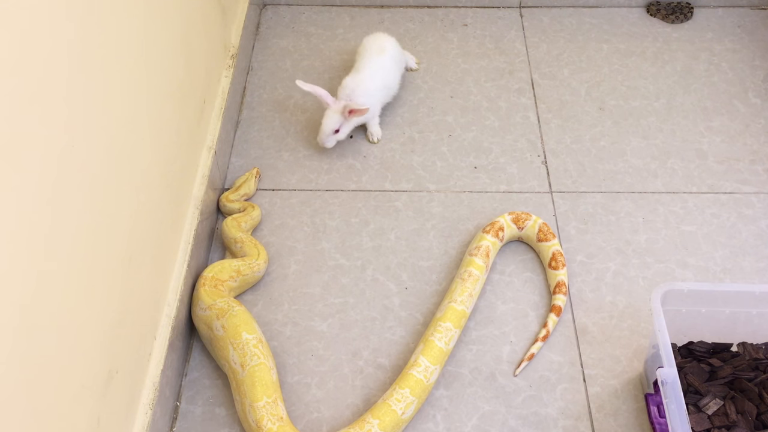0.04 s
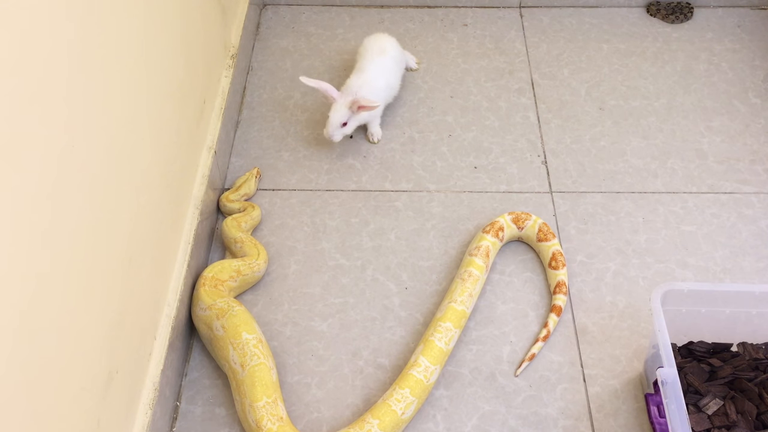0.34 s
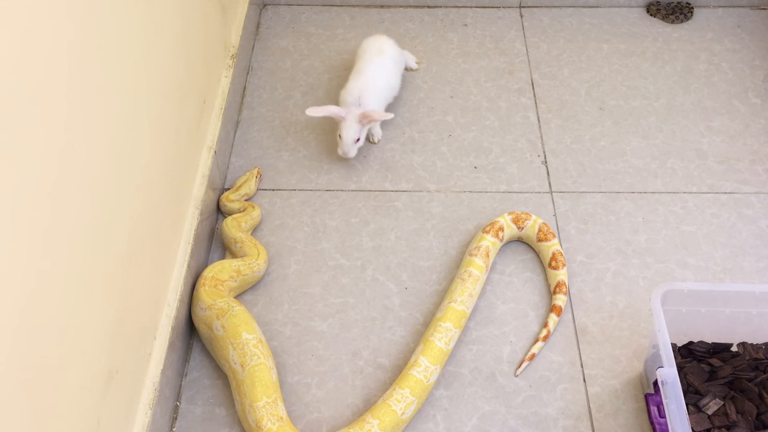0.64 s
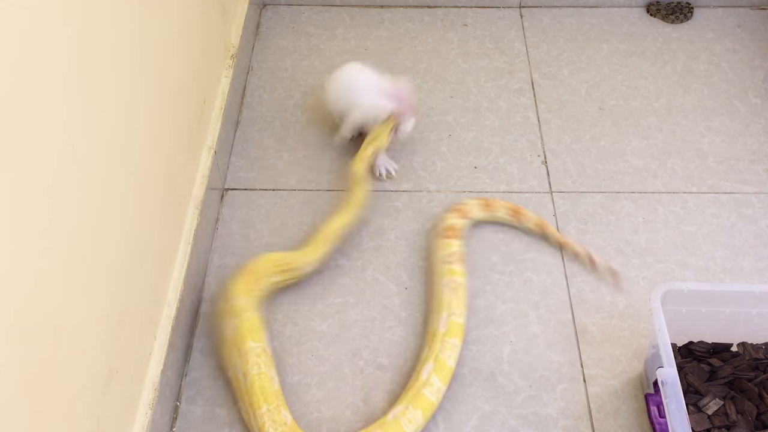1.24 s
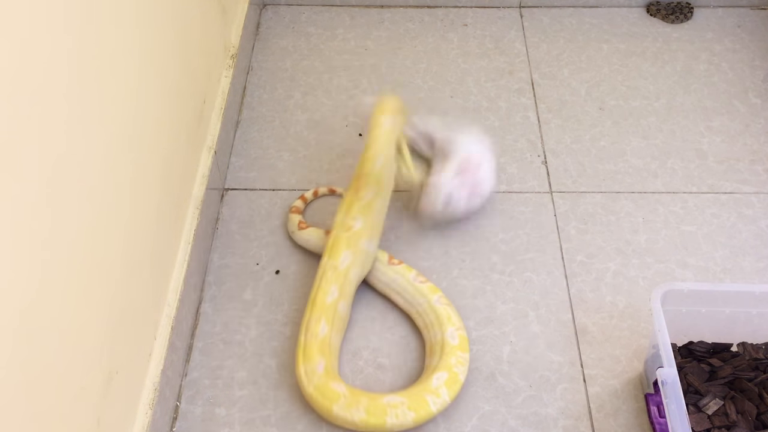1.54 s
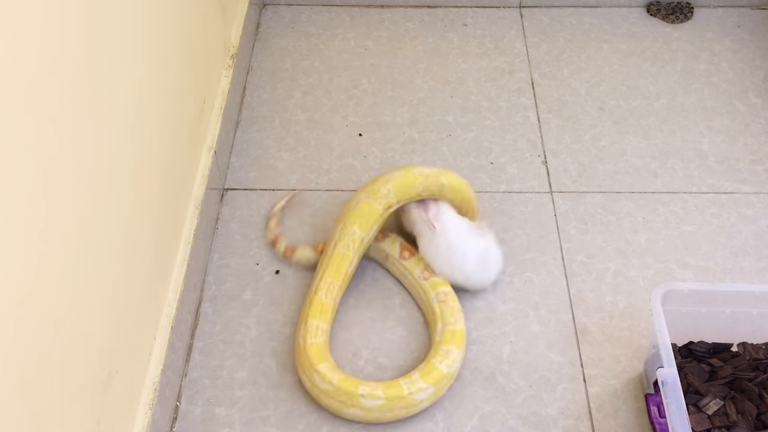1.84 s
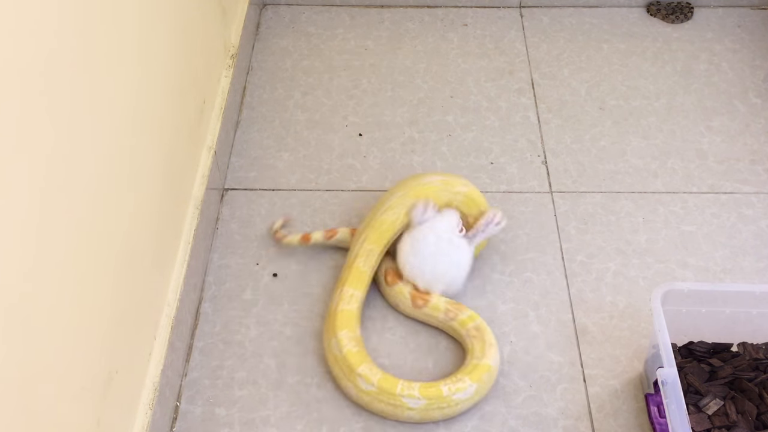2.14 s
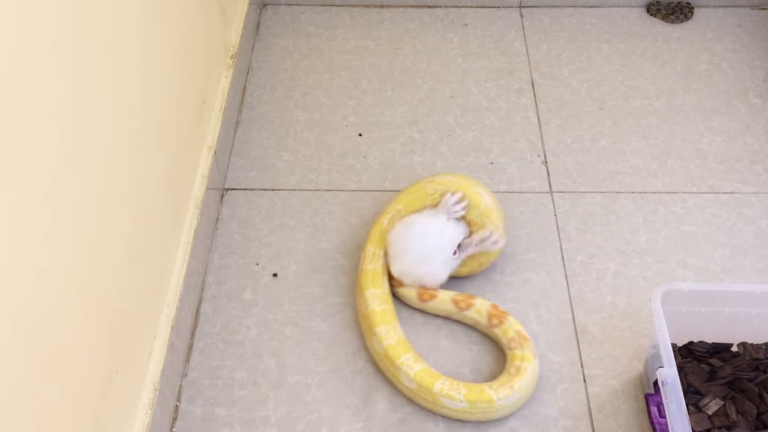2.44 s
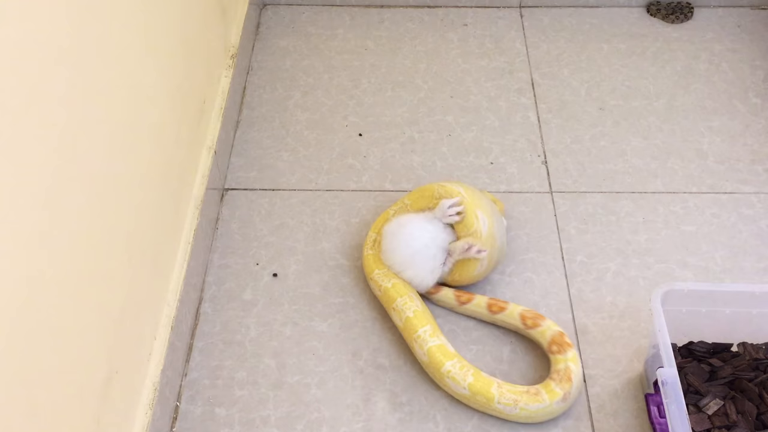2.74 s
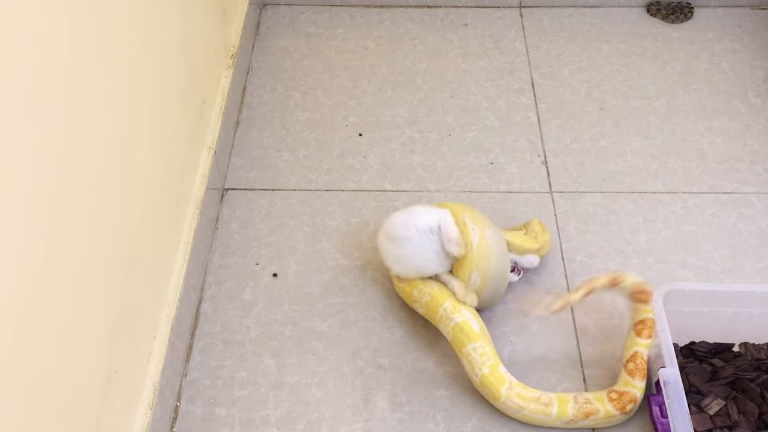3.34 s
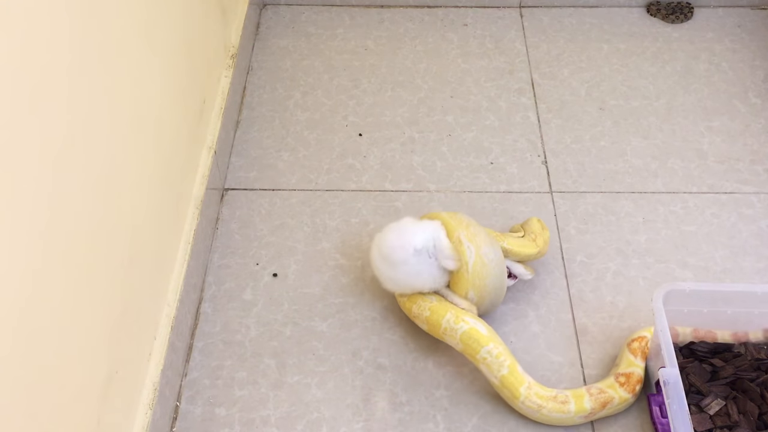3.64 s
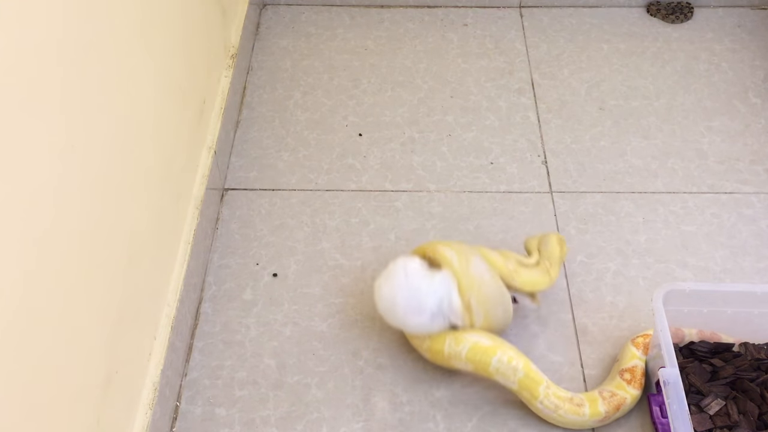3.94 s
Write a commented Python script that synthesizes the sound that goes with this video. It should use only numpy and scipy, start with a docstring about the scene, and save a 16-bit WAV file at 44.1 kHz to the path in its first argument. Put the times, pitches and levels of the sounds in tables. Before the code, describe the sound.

A rabbit's loud, high-pitched squeal turns to a hoarse scream in an echoing room.

```python
"""A python seizes a rabbit in a bare, reverberant tiled room, over a low ventilation hum.
First come a faint squeak and the friction noise of a scuffle on the tiles. The rabbit's vocal folds
then sound a rising yelp and a long squeal, harmonics shaped by the resonances of the throat; the squeal
jumps in pitch and tears into a rasp. Last, the folds vibrate chaotically in a hoarse, pitchless
scream that fades."""
import sys
import numpy as np
from scipy import signal
from scipy.fft import rfft, irfft
from scipy.io import wavfile

SR = 44100
rng = np.random.default_rng(int(sys.argv[2]) if len(sys.argv) > 2 else 0)


def put_to_file(sound):
    """Save the sound as 16-bit audio at rate SR, in the file named by the first command-line argument."""
    columns = np.atleast_2d(sound).T  # one column per channel
    safe = np.clip(columns, -1, 1)
    whole_steps = np.round(safe * 32767)
    wavfile.write(sys.argv[1], SR, whole_steps.astype(np.int16))


N = 176400
T = np.arange(N) / SR

# Spectrum of the moving air. Each row: frequency in Hz, relative level in dB.
AIR_SPECTRUM = [(20, -62), (32, -56), (40, -16), (49, -3.5), (64, -7), (80, -0.5), (98, -9), (125, -3),
                (160, -4.5), (200, -11.5), (310, -16), (420, -21.5), (550, -19), (680, -16), (820, -23.5),
                (1210, -23.5), (2020, -27), (3000, -36), (3930, -46), (6000, -56), (15000, -67)]
# Ventilation tones. Each row: frequency in Hz, level in dB.
HUM_TONES = [(64.6, -48), (118.8, -50.5), (231.5, -60), (549, -66), (646, -71)]
# Reverberation time. Each row: frequency in Hz, seconds to decay by 60 dB.
ROOM_T60 = [(500, 1.6), (2500, 1.59), (5000, 1.3), (9000, 1.22), (15000, 0.74)]
# Floor and wall reflections. Each row: delay in seconds, level in dB relative to the direct sound.
REFLECTIONS = [(.0019, -21), (.0046, -5.5)]
# Bands of the squeak. Each row: centre in Hz, level in dB.
SQUEAK_BANDS = [(4140, -72), (5520, -70), (7170, -71), (8720, -71), (10400, -83), (12850, -83),
                (14250, -88)]
# Scuffs and bumps. Each row: start, attack and decay in seconds, level in dB, centre and width in Hz.
SCUFFS = [(1.19, .035, 0.067, -59.5, 11700, 16200), (1.245, 0.026, 0.016, -47, 1200, 2480),
          (1.336, 0.021, 0.0074, -51, 3650, 1100), (1.28, 0.083, 0.11, -57, 9900, 16000),
          (1.608, 0.0023, 0.015, -42, 800, 1080), (1.63, 0.062, 0.039, -44.5, 230, 300),
          (1.65, 0.044, 0.026, -44, 856, 1000), (3.599, 0.11, 0.89, -49, 1326, 1320),
          (3.62, 0.031, .3, -58, 657, 250)]
# Throat response for the tone, the rasp and the scream. Each row: frequency in Hz, relative gain in dB.
TONE_SPECTRUM = [(1200, -24), (1800, -4.5), (2300, -8.5), (2950, -3), (3800, 8), (4750, 3), (5900, 0),
                 (7200, -8.5), (9300, -7), (10500, -20.5), (12000, -13), (15500, -22)]
RASP_SPECTRUM = [(1000, -51), (1800, -29), (2400, -4.5), (3000, -8.5), (3450, 8.5), (4100, -0.5), (5300, 3),
                 (6500, -8.5), (8000, -15), (9600, -7), (12000, -22), (15500, -26)]
SCREAM_SPECTRUM = [(600, -21.5), (1500, -23.5), (2000, -2), (2800, 2), (5200, -3), (6200, -8), (8400, -14),
                   (10000, -14), (12200, -22), (15500, -30)]
# The yelp. Each row: time in seconds, pitch in Hz, level in dB, roughness from 0 to 1.
YELP_CONTOUR = [(1.708, 1290, -54, 0.67), (1.724, 1610, -36, 0.47), (1.746, 1784, -33, 0.18),
                (1.76, 2177, -25, 0.27), (1.772, 2410, -23.5, 0.06), (1.79, 2515, -24, 0),
                (1.803, 2254, -33, .1), (1.808, 2400, -73, .3)]
# Fundamental of the squeal. Each row: time in seconds, pitch in Hz.
SQUEAL_PITCH = [(1.86, 2430), (1.95, 2655), (2.0, 2676), (2.03, 2883), (2.112, 2992), (2.114, 2580),
                (2.13, 2342), (2.156, 2340), (2.158, 2933), (2.176, 2926), (2.178, 2327), (2.29, 2223),
                (2.312, 2344), (2.34, 2304), (2.395, 2361), (2.45, 2334), (2.514, 2371), (2.515, 2702),
                (2.6, 2834), (2.66, 2906), (2.745, 3173), (2.77, 2650), (2.83, 2874), (2.88, 3011),
                (2.94, 2674), (2.99, 2633), (3.03, 2418), (3.06, 2574), (3.09, 2413), (3.11, 1972),
                (3.22, 1827)]
# Vocal effort. Each row: time in seconds, level in dB, spectral tilt in dB per octave.
SQUEAL_EFFORT = [(1.86, -40.5, -32), (1.96, -35.5, -17), (2.08, -34.5, -7), (2.135, -36.5, -4.5),
                 (2.19, -44.5, -11.5), (2.25, -30, -8.5), (2.4, -27, -5), (2.5, -23, -1), (2.53, -32, -1),
                 (2.64, -29.5, 0.5), (2.74, -24.5, 1.5), (2.83, -21, -5.5), (2.9, -23.5, -3.5),
                 (2.98, -21.5, 4.5), (3.07, -22, -5.5), (3.125, -24.5, 4.5), (3.2, -31.5, -7.5)]
# Irregularity of the folds. Each row: time in seconds, roughness and rasp share from 0 to 1.
SQUEAL_ROUGHNESS = [(1.86, .22, .25), (2.0, .25, .14), (2.12, .33, .2), (2.22, .08, .04), (2.28, .04, .01),
                    (2.51, .04, .01), (2.53, .24, .03), (2.72, .27, .07), (2.78, .38, .2), (2.9, .36, .33),
                    (2.95, .36, .8), (3.02, .24, .76), (3.08, .18, .55), (3.13, .22, .52), (3.2, .4, .85)]
# Period doubling. Each row: time in seconds, gain of the half-order harmonics in dB.
SQUEAL_DOUBLING = [(2.41, -52), (2.43, -24.5), (2.51, -20.5), (2.53, -42)]
# Surges as the squeal catches. Each row: time and Gaussian width in seconds, boost in dB.
SQUEAL_SURGES = [(2.012, .004, 8), (2.04, .005, 4), (2.079, .006, 8), (2.111, .005, 7), (2.167, .006, 14)]
# The scream. Each row: time in seconds, level in dB, main resonance in Hz, treble gain in dB.
SCREAM_CONTOUR = [(3.445, -39, 3002, 2.5), (3.46, -27.5, 3200, 6), (3.49, -21, 3900, 7),
                  (3.525, -25.5, 4086, 7), (3.565, -28.5, 3950, 5), (3.6, -25, 3900, 5),
                  (3.66, -29.5, 3236, 5), (3.8, -36.5, 3224, 5), (3.9, -31.5, 3300, -4.5),
                  (3.99, -51.5, 3200, -7)]


def undb(db):
    """Amplitude ratio for a level in decibels."""
    return 10 ** (np.asarray(db) / 20)


def unit(x):
    """Normalisation to an rms of 1."""
    return x / np.sqrt(np.mean(x ** 2))


def curves(table):
    """Linear interpolation in time, one control curve per value column."""
    times, *columns = np.array(table, float).T
    return [np.interp(T, times, column) for column in columns]


def during(table):
    """Trapezoidal window from the first row to the last, with 4 ms edges."""
    return np.clip((T - table[0][0]) / .004, 0, 1) * np.clip((table[-1][0] - T) / .004, 0, 1)


def at(points, hz):
    """Interpolation of (Hz, value) points on a logarithmic frequency axis."""
    f, values = np.array(points, float).T
    return np.interp(np.log(hz + 1), np.log(f), values)


def colour(x, spectrum):
    """Linear filtering by a (Hz, dB) spectrum, to rms 1."""
    f = np.arange(N // 2 + 1) * SR / N
    return unit(irfft(rfft(x) * undb(at(spectrum, f)), N))


def band(hz, width_hz):
    """Response of one resonance to white noise, rms 1."""
    f = np.arange(N // 2 + 1) * SR / N + 1
    detuning = (f - hz * hz / f) / width_hz
    return unit(irfft(rfft(rng.standard_normal(N)) / (1 + detuning ** 2), N))


def wander(hz):
    """Low-pass noise: random fluctuation up to the given rate, rms 1."""
    f = np.arange(N // 2 + 1) * SR / N
    return unit(irfft(rfft(rng.standard_normal(N)) / (1 + (f / hz) ** 4), N))


def narrowband(phase, waver_hz):
    """Random quadrature modulation spreads a tone into a narrow band, rms 1."""
    return unit(wander(waver_hz) * np.cos(phase) + wander(waver_hz) * np.sin(phase))


def swell(start, attack, decay):
    """Linear rise and exponential decay, with times in seconds."""
    return np.clip((T - start) / attack, 0, 1) * np.exp(-np.maximum(T - start - attack, 0) / decay)


def ventilation():
    """Superposition of broadband air rumble and wavering hum tones."""
    air = colour(rng.standard_normal(N), AIR_SPECTRUM) * undb(-44 + 0.3 * wander(18))
    hum = sum(undb(db) * narrowband(2 * np.pi * hz * T, waver_hz=2.4) for hz, db in HUM_TONES)
    return air + hum


def room(x, early_db=-1.5, tail_db=-2.5, tail_onset_s=0.0098):
    """Reverberation: hard walls return early reflections, then a diffuse tail whose treble dies first."""
    f = np.arange(N // 2 + 1) * SR / N
    noise, tail = rfft(rng.standard_normal(N)), 0
    edges_hz = [0, 1000, 2000, 3200, 4500, 6000, 8000, 10500, 13000, 22050]
    for lo, hi in zip(edges_hz, edges_hz[1:]):
        decay = np.exp(-np.log(1000) * T / at(ROOM_T60, (lo + hi) / 2))
        tail += irfft(noise * ((f >= lo) & (f < hi)), N) * decay
    tail *= (T > tail_onset_s) * np.sqrt(2 * np.log(1000) / SR)
    echoes = sum(undb(db) * np.interp(T - delay, T, x) for delay, db in REFLECTIONS)
    return undb(early_db) * (x + echoes) + undb(tail_db) * signal.fftconvolve(x, tail)[:N]


def squeak():
    """Narrow resonances under one brief envelope are heard as a faint squeak."""
    bands = sum(undb(db) * band(hz, width_hz=400) for hz, db in SQUEAK_BANDS)
    return bands * swell(start=0.914, attack=0.052, decay=0.061)


def scuffle(grain_db=2):
    """Friction of fur, claws and scales on the tiles gives grainy bursts of noise."""
    scuffs = sum(undb(db) * band(hz, width) * swell(start, attack, decay)
                 for start, attack, decay, db, hz, width in SCUFFS)
    return scuffs * undb(grain_db * wander(130))


def flutter(roughness):
    """Amplitude modulation by uneven bursts of air through slack vocal folds."""
    depth = 0.61 * roughness
    return np.exp(depth * wander(191) - depth ** 2)  # the offset preserves mean power


def voice(hz, tilt_db, roughness, rasp_share, doubling_db, rasp_db=1.5):
    """Source and filter: the throat shapes the harmonics of unsteady folds and the rasp of torn air."""
    jitter = 0.082 * wander(593)
    wobble = 0.035 * wander(45)
    tremor = 0.00214 * wander(74)
    phase = 2 * np.pi * np.cumsum(hz * (1 + roughness * (jitter + wobble) + tremor)) / SR
    tone, power = 0, 0
    for order in np.arange(2, 17) / 2:  # half orders arise from period doubling
        db = at(TONE_SPECTRUM, order * hz) + tilt_db * np.log2(order) + (doubling_db if order % 1 else 0)
        gain = undb(db) * (order * hz < SR / 2)
        tone += gain * np.sin(order * phase)
        power += gain ** 2 / 2
    pulsed_air = rng.standard_normal(N) * (1 + 0.56 * np.cos(phase))
    rasp = undb(rasp_db) * colour(pulsed_air, RASP_SPECTRUM)
    share = np.clip(rasp_share, 0, 1)
    return (np.sqrt(1 - share ** 2) * tone / np.sqrt(power) + share * rasp) * flutter(roughness)


def yelp():
    """A short upward glide of the fundamental, whose rasp is proportional to its roughness."""
    hz, db, roughness = curves(YELP_CONTOUR)
    cry = voice(hz, tilt_db=-3, roughness=roughness, rasp_share=0.5 * roughness, doubling_db=-41)
    return cry * undb(db) * during(YELP_CONTOUR)


def squeal(tilt_per_surge_db=0.68):
    """Nonlinear fold vibration with pitch jumps: thin and catching, then clean and piercing, then torn."""
    hz, = curves(SQUEAL_PITCH)
    db, tilt_db = curves(SQUEAL_EFFORT)
    doubling_db, = curves(SQUEAL_DOUBLING)
    surge_db = sum(boost * np.exp(-.5 * ((T - time) / width) ** 2) for time, width, boost in SQUEAL_SURGES)
    # A surge steadies the folds and feeds mostly the fundamental.
    roughness, rasp_share = curves(SQUEAL_ROUGHNESS) * undb(-surge_db)
    cry = voice(hz, tilt_db - tilt_per_surge_db * surge_db, roughness, rasp_share, doubling_db)
    return cry * undb(db + surge_db) * during(SQUEAL_EFFORT)


def scream(crossover_hz=5500, resonance_db=-2):
    """Aperiodic excitation: chaotic folds drive the throat, whose main resonance moves with the mouth."""
    db, resonance_hz, treble_db = curves(SCREAM_CONTOUR)
    rasp = colour(rng.standard_normal(N), SCREAM_SPECTRUM)
    low = signal.sosfiltfilt(signal.butter(2, crossover_hz, fs=SR, output="sos"), rasp)
    treble = (rasp - low) * undb(treble_db)
    resonance = narrowband(2 * np.pi * np.cumsum(resonance_hz) / SR, waver_hz=260)
    cry = unit(low + treble + undb(resonance_db) * resonance)
    return cry * flutter(roughness=0.4) * undb(db) * during(SCREAM_CONTOUR)


def scene():
    """Superposition in one channel: the struggle reverberates in the room, over the ventilation."""
    struggle = yelp() + squeal() + scream() + squeak() + scuffle()
    return (room(struggle) + ventilation())[None]


def record(dry, cutoff_hz=15720):
    """Steep low-pass filtering removes the highest treble."""
    return signal.sosfilt(signal.ellip(10, .2, 80, cutoff_hz, fs=SR, output="sos"), dry)


dry = scene()
out = record(dry)
put_to_file(out)
```